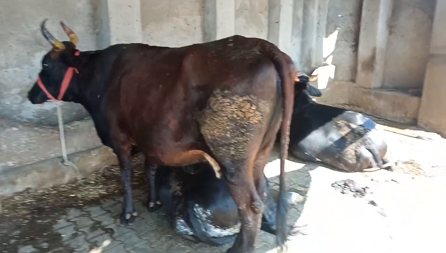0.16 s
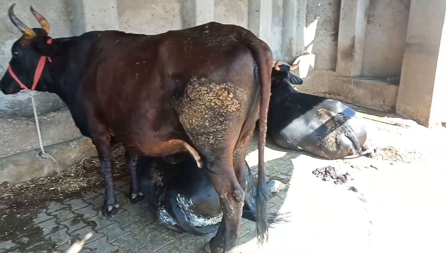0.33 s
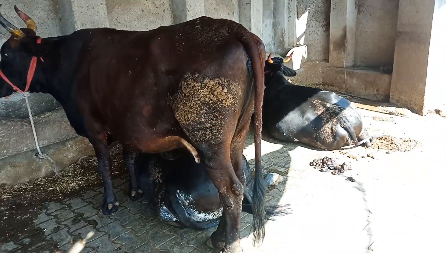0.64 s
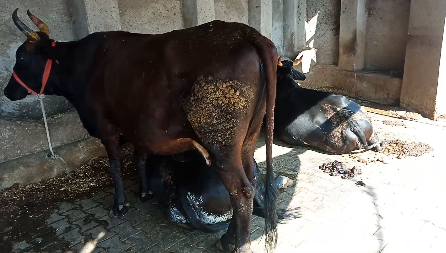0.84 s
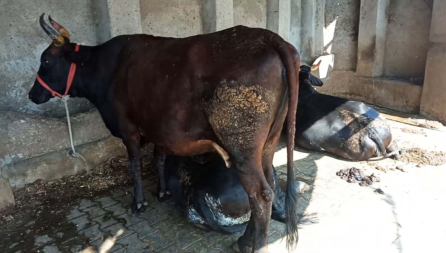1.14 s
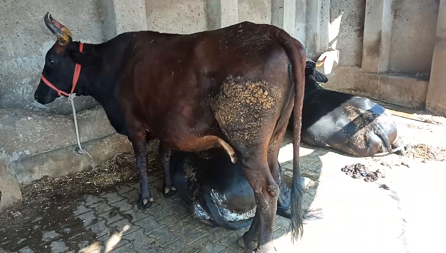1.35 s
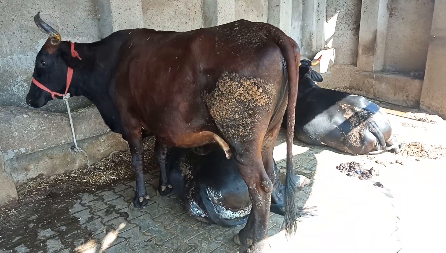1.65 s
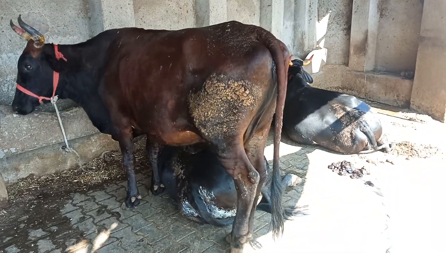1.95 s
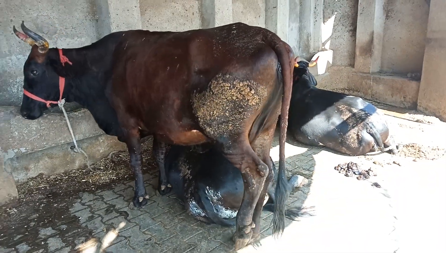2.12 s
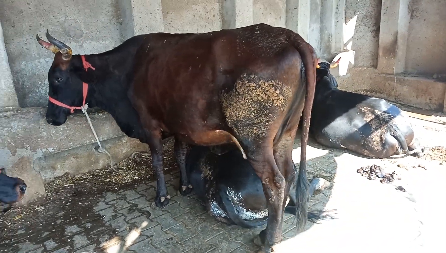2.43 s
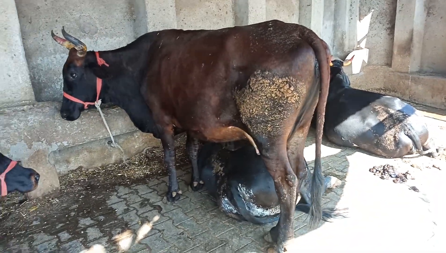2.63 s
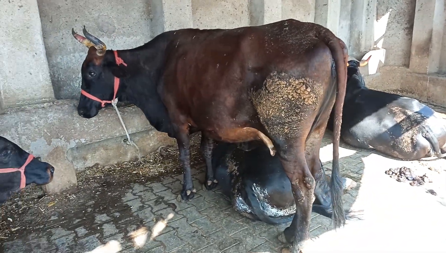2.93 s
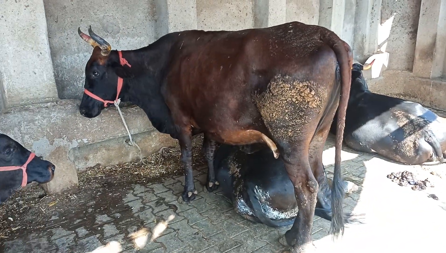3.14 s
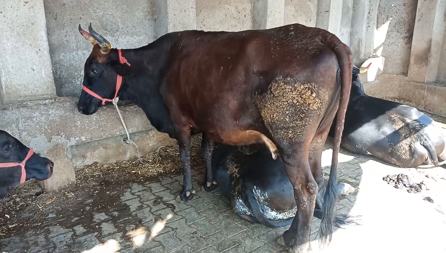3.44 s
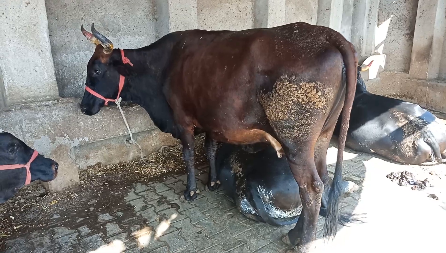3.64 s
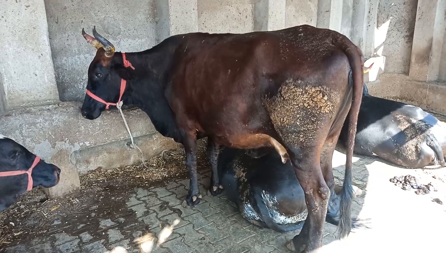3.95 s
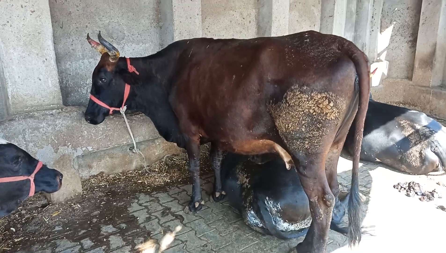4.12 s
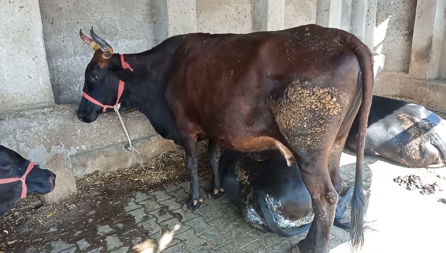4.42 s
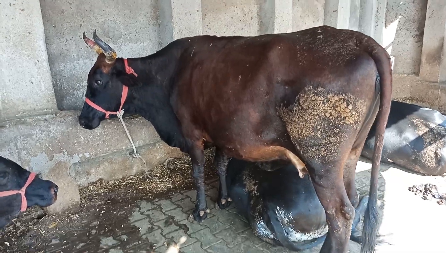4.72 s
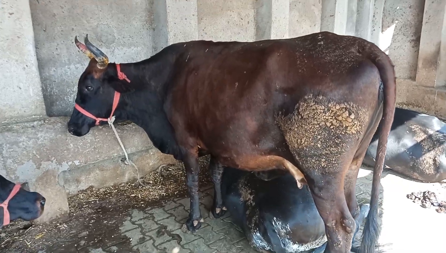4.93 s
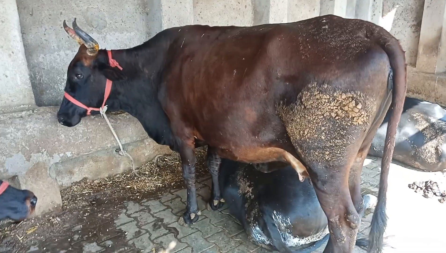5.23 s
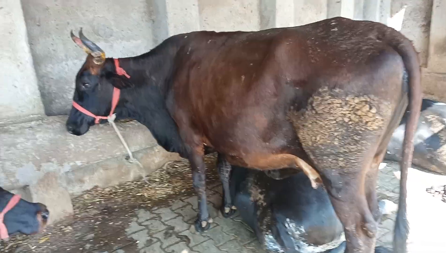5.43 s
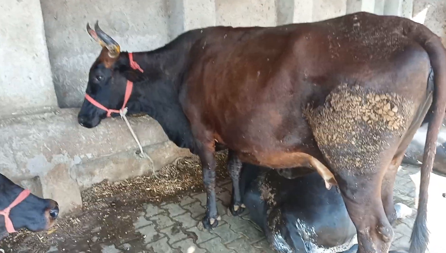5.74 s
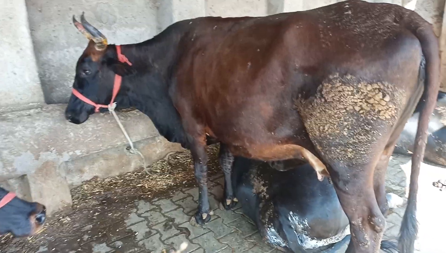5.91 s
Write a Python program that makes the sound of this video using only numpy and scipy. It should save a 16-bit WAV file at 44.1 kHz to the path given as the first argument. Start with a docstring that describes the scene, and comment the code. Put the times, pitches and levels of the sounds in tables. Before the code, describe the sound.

A small microphone stands a few metres from cattle in an open shed with concrete walls and brick paving. At 0 s there is a brief rustle with hiss and light patter, fading to near silence by 0.2 s. Faint ticks come around 0.4 to 0.5 s as the hiss returns in steps. From about 0.65 s, clear single drops slap the brick, thickening by 1.2 s into a steady stream with bright bubble pops, crisp spray and sharp ticks. It is strong around 1.5 to 1.9 s, thins slightly near 2 to 2.2 s, then surges from 2.3 to 3.1 s with a few deeper gulps. It eases around 3.9 to 4.4 s, picks up at 4.6 s and continues uneven, softer and wetter to the end at 6 s. Short wall echoes and narrow ringing follow every splash; low rustles swell faintly near 1.25, 3.8 and 5.3 s.

```python
"""In an open cattle shed, a stream of liquid falls onto brick paving a few metres from a small microphone.
Drops slap the bricks and trap bubbles that pop for a few cycles, amid a patter of small bubbles and spray.
The concrete walls throw each splash back, and narrow tones ring after it.
The level of rumble and hiss is turned down at first, then returns in steps; a low rustle swells now and then."""
import sys
import numpy as np
from scipy import signal
from scipy.fft import rfft, irfft
from scipy.io import wavfile
from scipy.ndimage import uniform_filter1d

SR = 44100
rng = np.random.default_rng(int(sys.argv[2]) if len(sys.argv) > 2 else 0)


def file_out(sig):
    """Save sig as 16-bit WAV at sys.argv[1]."""
    # one column per channel
    cols = np.atleast_2d(sig).T
    # limit, then scale
    lim = np.clip(cols, -1, 1)
    pcm = np.round(lim * 32767).astype(np.int16)
    wavfile.write(sys.argv[1], SR, pcm)


N = 267687


def gain_of(db):
    """Decibels as a factor on the wave."""
    return 10 ** (np.asarray(db) / 20)


def evened(x):
    """x scaled to an average (RMS) strength of 1."""
    return x / np.sqrt(np.mean(x ** 2) + 1e-20)


def read_spectrum(points, hz):
    """The values of a pitch table at the frequencies hz, read along a logarithmic pitch scale."""
    table_hz, value = np.transpose(points)
    return np.interp(np.log(hz + 1), np.log(table_hz + 1), value)


def follow(rows):
    """The columns of a time table at every sample."""
    s, *columns = np.transpose(rows)
    t = np.arange(N) / SR
    return [np.interp(t, s, column) for column in columns]


def coloured(x, points):
    """x with each pitch made stronger or weaker by a spectrum table."""
    hz = np.fft.rfftfreq(len(x), 1 / SR)
    return irfft(rfft(x) * gain_of(read_spectrum(points, hz)), len(x))


def add(mix, s, sound):
    """Lay a sound into the mix from time s on."""
    part = mix[round(s * SR):][:len(sound)]
    part += sound[:len(part)]


def smoothed_patches(noise, sizes):
    """Random louder and softer patches: noise averaged over neighbours along both axes."""
    half_smooth = uniform_filter1d(noise, size=sizes[0], axis=0)
    return evened(uniform_filter1d(half_smooth, size=sizes[1], axis=1))


def pop(hz, cycles, glide):
    """A bubble swells for the given cycles, then rings down; glide lifts its pitch near the surface; peak 1."""
    u = np.arange(1200) / SR * hz / cycles
    ring = u * np.exp(1 - u) * np.sin(2 * np.pi * cycles * u * (1 + glide * u))
    return ring / abs(ring).max()


# colour of the low rustle, before it is evened: (pitch [Hz], strength [dB per Hz])
RUSTLE_COLOUR = [(60, -30), (150, -3.5), (300, -2), (600, -3.5), (1100, -9.5), (2500, -7.5), (5000, -38.5)]
# swells of the rustle, added to its resting level: (centre time [s], peak [dB], half width [s])
RUSTLE_SWELLS = [(0.0, -52, 0.03), (0.816, -57, 0.077), (1.25, -54.5, 0.19), (1.88, -60.5, 0.058),
                 (3.78, -55, 0.16), (4.72, -63.5, 0.24), (5.32, -52.5, 0.15), (5.93, -56, 0.3)]
RUSTLE_REST_DB, REST_FROM_S = -64.5, .66


def rustle():
    """Noise built from short random spectra in patches, resting low and swelling now and then."""
    real, imaginary, noise = rng.standard_normal((N // 256 + 5, 513, 3)).T
    patches = smoothed_patches(noise, sizes=(2, 7))  # over pitch, over time
    colour_db = read_spectrum(RUSTLE_COLOUR, np.fft.rfftfreq(1024, 1 / SR))[:, None]
    spectra = (real + 1j * imaginary) * gain_of(colour_db + 4.9 * patches)
    t = np.arange(N) / SR
    level = gain_of(RUSTLE_REST_DB) * (t > REST_FROM_S)
    for s, db, width in RUSTLE_SWELLS:
        level += gain_of(db) * np.exp(-((t - s) / width) ** 4)
    return level * evened(signal.istft(spectra, nperseg=1024, noverlap=768)[1][:N])


# colour of the rumble and hiss, before they are evened: (pitch [Hz], strength [dB per Hz])
AIR_COLOUR = [(20, -30), (45, -5.5), (110, 6), (250, 1.5), (1000, -6), (3500, -14), (6000, -37),
              (10000, -44), (15000, -44)]
# boost over AIR_DB as the two are turned down and return: (time [s], bass boost [dB], treble boost [dB])
AIR_FADE = [(0, 13, 25), (.12, 4, 21), (.22, -7.5, 0.5), (.415, -8.5, -19), (.425, -7, 20.5), (.64, -2, 3),
            (.66, 2.5, 29.5), (6.07, 8.5, 26.5)]
AIR_DB = -67  # level before the boosts


def rumble_and_hiss():
    """Noise split at 3500 Hz into bass and patchy treble, whose levels move separately."""
    air = gain_of(AIR_DB) * evened(coloured(rng.standard_normal(N), AIR_COLOUR))
    bass = signal.sosfiltfilt(signal.butter(2, 3500, fs=SR, output="sos"), air)
    bass_db, treble_db = follow(AIR_FADE)
    return gain_of(bass_db) * bass + gain_of(treble_db) * patchy(air - bass, depth_db=1.9)


def patchy(x, depth_db):
    """x with louder and softer patches drifting over time and pitch."""
    spectra = signal.stft(x, nperseg=256)[2]
    noise = rng.standard_normal(spectra.T.shape)
    patches = smoothed_patches(noise, sizes=(10, 9))  # over time, over pitch
    return signal.istft(spectra * gain_of(depth_db * patches.T), nperseg=256)[1][:N]


# the flow, before splashes and colouring: (time [s], patter level [dB], spray level [dB])
STREAM_FLOW = [(0, -45, -76), (.2, -98, -103), (.6, -75, -70.5), (.86, -66, -60), (1.2, -48, -50),
               (1.76, -46.5, -48), (1.86, -45, -46), (1.98, -56, -50.5), (2.26, -56, -50.5),
               (2.3, -42, -49), (2.55, -40, -52), (3.1, -44.5, -61.5), (3.5, -42.5, -53.5),
               (3.9, -48.5, -58.5), (4.43, -47.5, -53), (4.6, -43, -54.5), (5.2, -43.5, -57.5),
               (6.07, -40, -59)]
# small bubbles when the commonest pitch is 2800 Hz; slides with the flow: (pitch [Hz], strength [dB])
BUBBLE_PITCHES = [(800, -30), (1300, -5.5), (1900, 4.5), (2800, 12.5), (3800, 2), (5000, -9), (6500, -11)]
# fine droplets of spray: (pitch [Hz], strength [dB])
SPRAY_PITCHES = [(3500, 8.5), (5000, -1), (6300, -2), (8500, -15.5), (11000, -34), (14500, -22)]
# a thinner flow traps smaller bubbles: the commonest pitch at full flow, its rise per dB less, its ceiling
FULL_DB, FULL_HZ, RISE_HZ_PER_DB, TOP_HZ = -34, 2604, 37, 3320
# liquid thrown up by a drop rains back: a drop of this peak doubles the patter or the spray
PATTER_DOUBLES_DB, SPRAY_DOUBLES_DB = -19, -31.5


def stream():
    """Countless small bubbles, whose sizes shift with the flow, and the fine ticks of the spray."""
    patter_db, spray_db = follow(STREAM_FLOW)
    rising_hz = FULL_HZ + RISE_HZ_PER_DB * (FULL_DB - patter_db)
    common_hz = np.clip(rising_hz, FULL_HZ / 2, TOP_HZ)

    def bubble_db(hz, at):
        return read_spectrum(BUBBLE_PITCHES, hz * 2800 / common_hz[at])

    def droplet_db(hz, at):
        return read_spectrum(SPRAY_PITCHES, hz)

    bubbles = patter(787, 6240, bubble_db, cycles=1.305, per_s=60, spread_db=3.9, drift_db=1.37)
    spray = patter(3500, 14500, droplet_db, cycles=1.1, per_s=60, spread_db=3.6, drift_db=5.)
    thrown = thrown_liquid()
    bubbles *= gain_of(patter_db) * (1 + thrown / gain_of(PATTER_DOUBLES_DB))
    spray *= gain_of(spray_db) * (1 + thrown / gain_of(SPRAY_DOUBLES_DB))
    return bubbles + spray


def patter(low_hz, high_hz, share_db, cycles, per_s, spread_db, drift_db):
    """Random pops at 20 pitches, each pitch at its own level, which drifts about ten times a second."""
    out = np.zeros(N)
    for hz in np.geomspace(low_hz, high_hz, num=20):
        at, size = scatter(per_s, spread_db)
        drift = np.interp(at, np.linspace(0, N, num=60), rng.standard_normal(size=60))
        strength = gain_of(share_db(hz, at) + drift_db * drift) * size
        clicks = np.bincount(at, strength, N)
        out += signal.oaconvolve(clicks, pop(hz, cycles, glide=0.035))[:N]
    return evened(out)


def scatter(per_s, spread_db):
    """Places and signed sizes of clicks at random moments, most small and a few large."""
    place, chance, sign = rng.random((round(per_s * N / SR), 3)).T
    size_db = spread_db * np.minimum(-np.log(1 - chance), 3)
    return (place * N).astype(int), gain_of(size_db) * np.sign(sign - .5)


def thrown_liquid(fade_s=.0031):
    """The summed peaks of the single drops, each dying away."""
    peaks = np.zeros(N)
    for s, db, _ in SINGLE_DROPS:
        add(peaks, s, gain_of([db]))
    return signal.lfilter([1], [1, -np.exp(-1 / (fade_s * SR))], peaks)


# the sharpest ticks of the spray, before colouring: (time [s], peak [dB], fizz against the peak [dB])
SHARP_TICKS = [(0.0463, -43, -17), (0.1381, -48, -33), (0.4309, -48, -21), (0.5322, -53, -28),
               (0.714, -39, -16), (0.7292, -38, -22), (0.8111, -45, -24), (0.8447, -35, -20),
               (0.868, -41, -15), (0.9225, -35, -32), (0.9737, -26, -44), (1.039, -35, -19),
               (1.0615, -35, -10), (1.1039, -31, -28), (1.133, -35, -26), (1.1837, -34, -12.5),
               (1.278, -36, -31), (1.2923, -26, -31), (1.3344, -45, -27), (1.4641, -35, -35),
               (1.6227, -34, -12), (1.6524, -37, -14), (1.696, -31, -17), (1.759, -33, -21),
               (1.7858, -29, -30), (1.8193, -27, -27), (1.9235, -32, -31), (2.0113, -45, -34),
               (2.081, -33.5, -23), (2.2025, -29, -27), (2.3516, -41, -32), (2.4114, -28, -20),
               (2.622, -32, -31), (2.6497, -33, -26), (4.0066, -40, -15), (4.0552, -36, -25),
               (4.0706, -31, -29), (4.2594, -24, -34), (4.4563, -25, -42), (4.8683, -32, -35),
               (5.7703, -47, -27), (5.8676, -38, -25)]
TICK_HZ, TICK_CYCLES = 5870, 0.55
FIZZ_ABOVE_HZ, FIZZ_S = 10000, 0.0039  # the fizz is strongest FIZZ_S after the tick starts


def ticks():
    """A sharp droplet makes a very short ring with a high fizz of noise that swells and dies behind it."""
    out, body = np.zeros(N), pop(TICK_HZ, TICK_CYCLES, glide=0)
    u = np.arange(len(body)) / SR / FIZZ_S
    high = signal.butter(6, FIZZ_ABOVE_HZ, "highpass", fs=SR, output="sos")
    hiss = evened(signal.sosfilt(high, rng.standard_normal((len(SHARP_TICKS), len(body)))))
    for (s, db, fizz_db), fizz in zip(SHARP_TICKS, hiss * u * np.exp(1 - u)):
        add(out, s, gain_of(db) * (body + gain_of(fizz_db) * fizz))
    return out


# single drops, loud and faint, before colouring: (time [s], pop's peak [dB], bubble's starting pitch [Hz])
SINGLE_DROPS = [(0.075, -35, 3170), (0.4309, -56, 2460), (0.5322, -49, 4900), (0.5661, -64, 3490),
                (0.611, -64, 3530), (0.6448, -23.5, 3080), (0.6803, -30, 3200), (0.8678, -28.5, 3740),
                (0.9214, -26.5, 3000), (0.9748, -26, 3730), (1.04, -34.5, 2980), (1.0736, -29.5, 3860),
                (1.0843, -24, 2800), (1.1087, -29.5, 2030), (1.1644, -27, 3320), (1.1835, -31.5, 3600),
                (1.218, -28.5, 2060), (1.249, -20.5, 2610), (1.278, -25, 3440), (1.2912, -25.5, 3220),
                (1.3502, -23, 3470), (1.369, -24.5, 2300), (1.4182, -28, 3680), (1.4602, -21.5, 3140),
                (1.5186, -23.5, 3030), (1.5365, -26, 3000), (1.5616, -15, 2340), (1.5964, -25.5, 3900),
                (1.6327, -17, 2420), (1.643, -21, 3670), (1.6927, -23, 3380), (1.719, -26, 3630),
                (1.7598, -28, 3100), (1.8187, -17.5, 2670), (1.833, -21.5, 2250), (1.8503, -17.5, 2770),
                (1.871, -18.5, 2800), (1.9239, -29, 3080), (2.0107, -25, 4450), (2.0535, -30.5, 3460),
                (2.06, -31.5, 3250), (2.081, -25.5, 3340), (2.149, -23.5, 2820), (2.1738, -35, 3400),
                (2.2026, -29.5, 3360), (2.229, -31.5, 3600), (2.2789, -21, 2680), (2.3188, -18.5, 1950),
                (2.373, -24.5, 3640), (2.4105, -25, 4200), (2.4786, -18.5, 3170), (2.5773, -17.5, 2990),
                (2.6043, -18, 2790), (2.6544, -20, 2630), (2.68, -30, 2650), (2.7042, -28, 3500),
                (2.7087, -24, 3320), (2.7273, -24.5, 3040), (2.7389, -21, 2600), (2.7752, -19, 2430),
                (2.827, -25.5, 2050), (2.9205, -25, 2860), (3.023, -18.5, 2900), (3.0613, -17, 2820),
                (3.15, -25.5, 2900), (3.1736, -22.5, 2580), (3.215, -30, 2800), (3.3135, -33, 1900),
                (3.3265, -29, 3220), (3.3857, -28, 3130), (3.4294, -25, 2370), (3.4486, -26, 2010),
                (3.514, -35, 3470), (3.571, -23.5, 2260), (3.6655, -22, 2230), (3.7222, -22.5, 2840),
                (3.8836, -24.5, 2150), (4.0363, -30, 2800), (4.0708, -22.5, 3330), (4.199, -30, 2260),
                (4.25, -26.5, 4030), (4.3012, -30, 3320), (4.454, -22, 3450), (4.5878, -22, 3360),
                (4.6196, -24, 3480), (4.63, -22, 3370), (4.641, -24, 3380), (4.666, -23, 2880),
                (4.7227, -24.5, 2850), (4.889, -22.5, 2760), (4.9077, -22, 2730), (5.032, -28.5, 3520),
                (5.0814, -22.5, 2180), (5.0908, -21.5, 2130), (5.1215, -24.5, 2580), (5.1586, -29, 3080),
                (5.2764, -27, 2620), (5.4508, -25, 3140), (5.465, -22.5, 3630), (5.5403, -24, 2880),
                (5.7215, -30, 2770), (5.771, -29, 2440), (5.7798, -19.5, 2700), (5.8403, -24.5, 2880),
                (5.9107, -19, 2720), (5.9544, -30, 2760), (5.9781, -23.5, 2670), (6.015, -22, 2600)]
# the slap is sharp on bare brick and softens as the puddle deepens: dB against the pop at first, loss per s
SLAP_DB, SLAP_LOSS_DB_PER_S = -1.5, 3.5
# froth bubbles have about the drop's pitch: dB against the pop, mean wait in s, pitch scatter (share)
FROTH_DB, FROTH_S, FROTH_SCATTER = -15, .017, 0.24


def drops():
    """Each single drop slaps the brick, pops, and leaves four froth bubbles that burst after it."""
    out, slap = np.zeros(N), pop(3620, 1.0, glide=0)
    for (s, db, hz), chance in zip(SINGLE_DROPS, rng.random((len(SINGLE_DROPS), 9))):
        add(out, s, gain_of(db) * pop(hz, 0.69 + 0.56 * chance[0], glide=0.0038))
        add(out, s, gain_of(db + SLAP_DB - SLAP_LOSS_DB_PER_S * s) * slap)
        for wait, size in chance[1:].reshape(-1, 2):
            froth_hz = hz * (1 + FROTH_SCATTER * (2 * size - 1))
            bubble = pop(froth_hz, cycles=1.25, glide=0.014)
            add(out, s - FROTH_S * np.log(1 - wait), gain_of(db + FROTH_DB) * bubble)
    return out


# large air pockets in the puddle, before colouring: (time [s], peak [dB], starting pitch [Hz])
AIR_GULPS = [(1.104, -40, 1470), (1.227, -30.5, 1510), (1.46, -30.5, 1640), (1.831, -32, 1480),
             (2.223, -33, 690), (2.233, -30, 850), (2.385, -34, 1430), (2.581, -26, 1280),
             (3.077, -33.5, 1220), (3.314, -30.5, 1530), (3.626, -34, 1260), (5.551, -31, 1280),
             (5.646, -32, 1170), (5.673, -30.5, 1190)]


def gulps():
    """A large air pocket gulps as a lower-pitched pop."""
    out = np.zeros(N)
    for s, db, hz in AIR_GULPS:
        add(out, s, gain_of(db) * pop(hz, 0.8, glide=0.0048))
    return out


def walls(x, count=6):
    """Six random tails take turns, so no single echo pattern colours the whole sound."""
    turn = np.arange(N) // 1300 % count  # the next tail every 1300 samples
    return sum(signal.fftconvolve(x * (turn == k), wall_tail())[:N] for k in range(count))


# how long the walls' tail takes to fall by 60 dB: (pitch [Hz], time [s])
WALL_DECAY = [(500, 0.24), (1500, 0.18), (3500, 0.19), (9000, 0.079)]
# strength of the walls' tail: (pitch [Hz], level [dB])
TAIL_COLOUR = [(500, -0.5), (2000, 0), (4000, -3.5), (7000, -4), (9000, -2), (14000, -9)]
# nearest surfaces, before a slight shift in time and the dulling: (delay [s], level [dB])
NEAR_ECHOES = [(.0039, -6), (.0092, -16), (0.014, -19), (0.028, -13)]
# wet surfaces dull the single echoes: (pitch [Hz], level [dB])
ECHO_COLOUR = [(4000, -0.5), (7000, -9)]


def wall_tail():
    """Sparse taps of random sign, each band dying at its own speed, and a few single echoes."""
    taps = np.zeros(SR // 2)
    at = np.arange(130, SR // 2 - 20, 20)
    taps[at + rng.integers(0, 20, len(at))] = rng.choice([-1., 1.], len(at))
    hz, t, spectra = signal.stft(taps, SR, nperseg=128)
    decay_db = -60 * t / read_spectrum(WALL_DECAY, hz)[:, None]
    tail = signal.istft(spectra * gain_of(decay_db), SR, nperseg=128)[1]
    echoes = np.zeros(len(tail))
    for (s, db), wander in zip(NEAR_ECHOES, rng.uniform(-1.1, 1, len(NEAR_ECHOES))):
        add(echoes, s * (1 + 0.0056 * wander), gain_of([db]))
    return coloured(tail / np.linalg.norm(tail), TAIL_COLOUR) + coloured(echoes, ECHO_COLOUR)


# narrow rings that every splash wakes in the shed: (pitch [Hz], level [dB])
SHED_RINGS = [(1155, 9), (1485, -1), (1765, 5), (2285, -0.5), (3105, -3.5), (3238, -3)]


def rings(x, t60_s=.1):
    """Each ring picks out its own narrow band and lets it linger, falling 60 dB in t60_s."""
    r = 10 ** (-3 / (t60_s * SR))  # what is left after one sample
    out = np.zeros(N)
    for hz, db in SHED_RINGS:
        feedback = [1, -2 * r * np.cos(2 * np.pi * hz / SR), r * r]
        out += gain_of(db) * signal.lfilter([1 - r, 0, r - 1], feedback, x)
    return out


# colour of all splashes: (pitch [Hz], level [dB])
PUDDLE_COLOUR = [(400, -8.5), (1000, -4.5), (2000, -2.5), (4300, -3), (4900, -6), (5500, -5), (6300, 0.5),
                 (7600, -3), (9200, -1.5), (10000, -8.5), (14000, -7)]
LAG_S = .0008  # drops, gulps and ticks sound this long after their listed times


def scene():
    """Splashes with their walls and rings, over the shed's background."""
    hits = np.roll(drops() + gulps() + ticks(), round(LAG_S * SR))
    splash = coloured(hits + stream(), PUDDLE_COLOUR)
    background = rustle() + rumble_and_hiss()
    return (splash + walls(splash) + rings(splash) + background)[None]


def record(dry):
    """The small microphone loses the deepest bass, then everything above 15700 Hz is cut."""
    thin = signal.sosfilt(signal.butter(2, 45, "highpass", fs=SR, output="sos"), dry)
    band_limit = signal.firwin(511, 15700, window=("kaiser", 9), fs=SR)
    return signal.oaconvolve(thin, band_limit[None], "same")


dry = scene()
out = record(dry)
file_out(out)
```